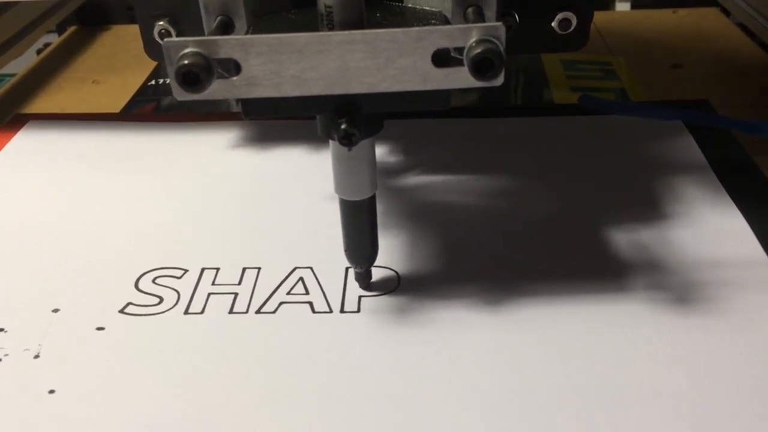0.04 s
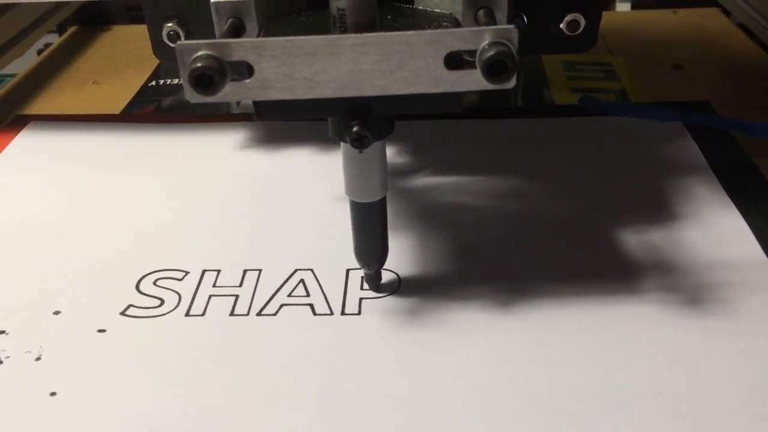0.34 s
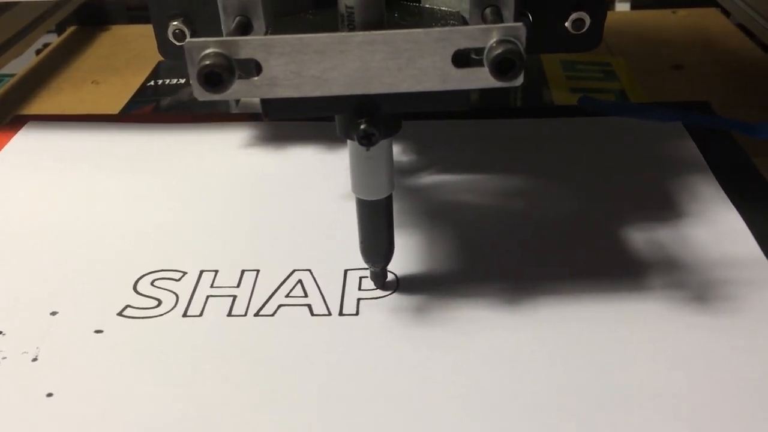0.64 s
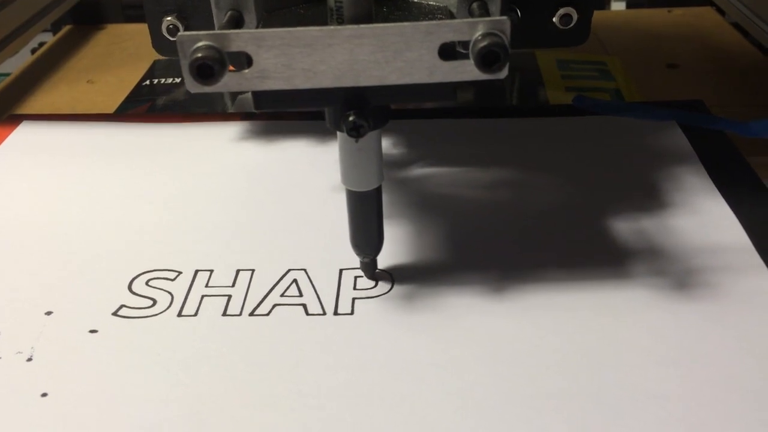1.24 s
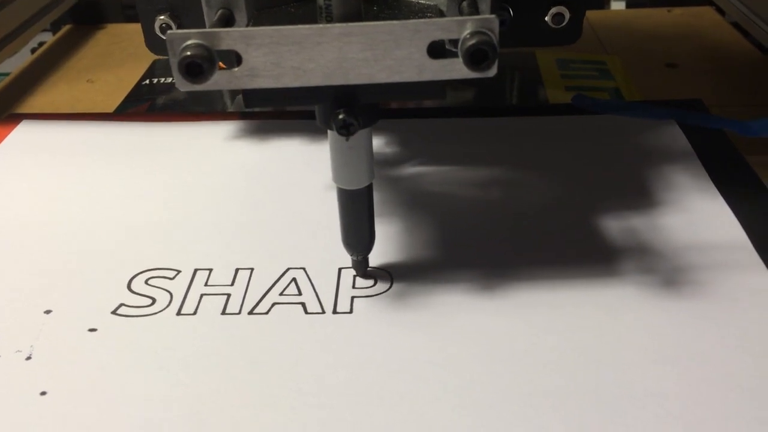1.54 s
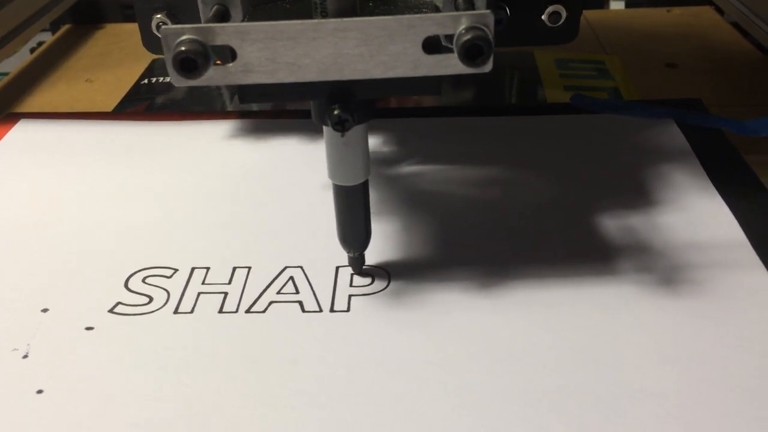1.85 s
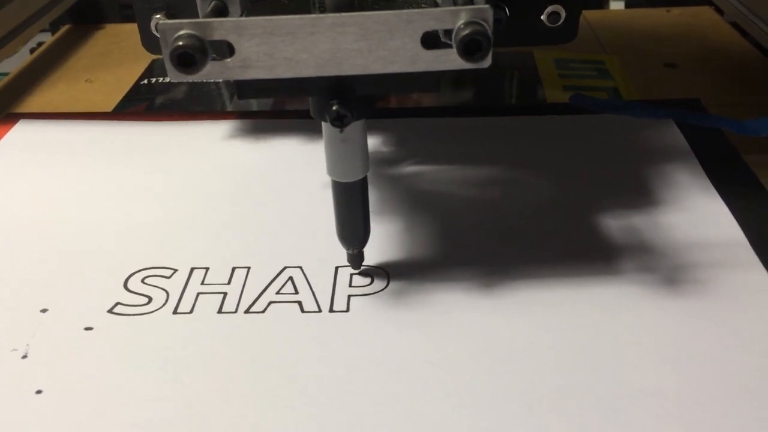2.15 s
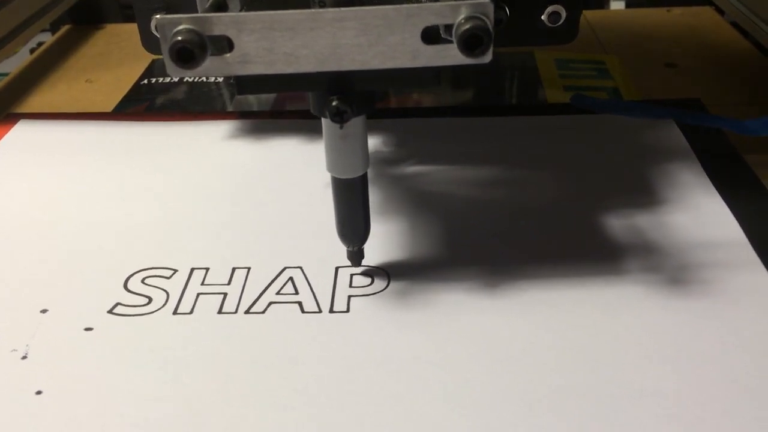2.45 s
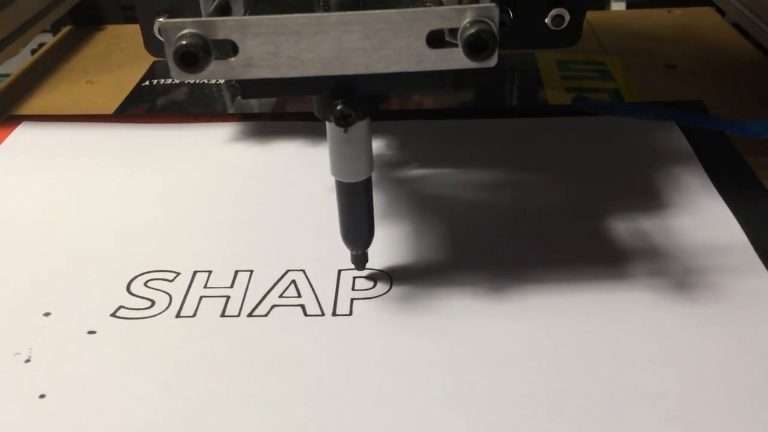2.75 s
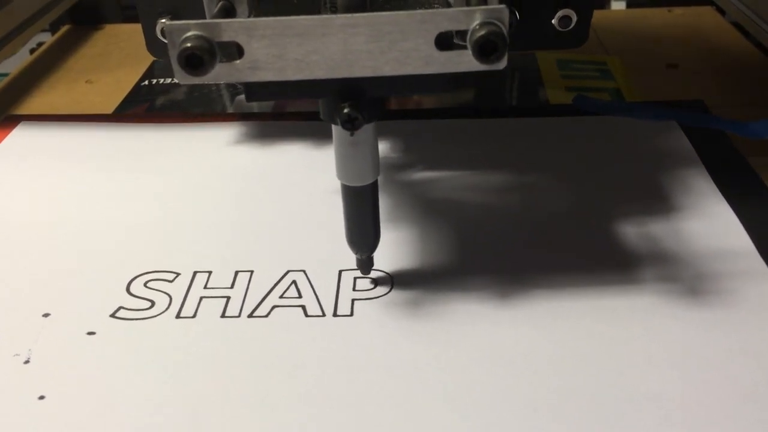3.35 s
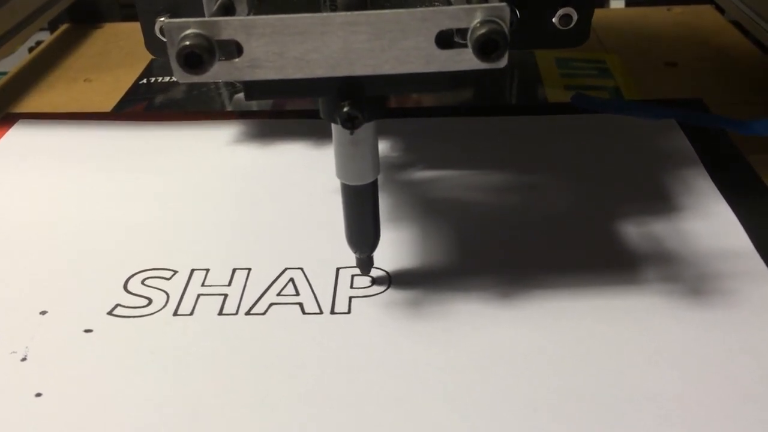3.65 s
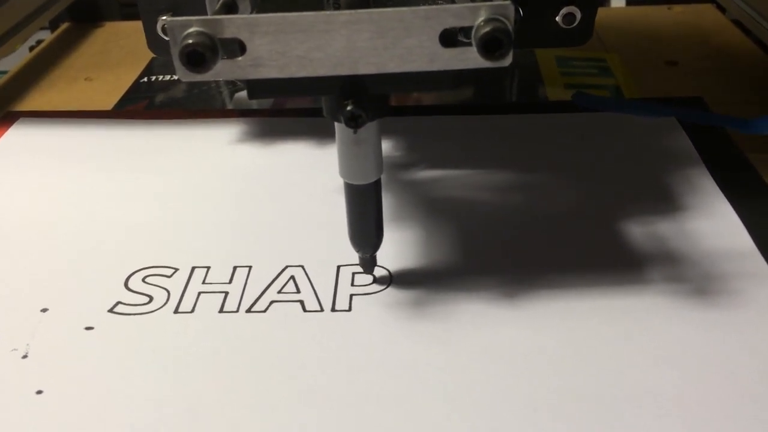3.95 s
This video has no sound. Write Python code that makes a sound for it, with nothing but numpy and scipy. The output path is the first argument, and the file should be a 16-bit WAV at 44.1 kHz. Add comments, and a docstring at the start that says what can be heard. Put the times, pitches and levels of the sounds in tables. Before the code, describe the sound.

A pen plotter's motors rise and fall in pitch, shuddering while the felt tip faintly scratches paper. The pen lifts with a squeak and a high buzz, then the carriage hums along steadily. Cooling fans drone underneath.

```python
"""Stepper motors sing up and down as a small pen plotter rounds a curved letter on a workshop bench.
The gantry shudders and knocks with the drive, and the felt tip scratches the paper. A lift screw then
raises the pen with a high buzzing whir, its steps ringing the frame, and stops with a clunk. The carriage
travels on at one speed with a throbbing hum. Two cooling fans beat underneath throughout."""
import sys
import numpy as np
from scipy import signal
from scipy.fft import rfft, irfft
from scipy.io import wavfile
from scipy.ndimage import uniform_filter1d

SR = 44100
rng = np.random.default_rng(int(sys.argv[2]) if len(sys.argv) > 2 else 0)


def inscribe(sig):
    """Save sig as 16-bit PCM at rate SR to the path in sys.argv[1].

    A 1-D sig is mono; a 2-D sig holds one channel per row.
    Samples are clipped to [-1, 1] before scaling.
    """
    pcm = np.round(np.clip(np.atleast_2d(sig).T, -1, 1) * 32767)
    wavfile.write(sys.argv[1], SR, pcm.astype(np.int16))


N = 176400  # 4 s


def undb(db):
    """Decibels to gain."""
    return 10 ** (np.asarray(db) / 20)


def unit(x):
    """Scale to rms 1."""
    return x / np.sqrt(np.mean(x ** 2))


def curve(x, table, column=1):
    """One column of a table, joined by straight lines along the first."""
    rows = np.array(table, float)
    return np.interp(x, rows[:, 0], rows[:, column])


def gate(t, start, end, fade=.016):
    """On between two times, with short fades."""
    return np.clip((t - start) / fade + .5, 0, 1) * np.clip((end - t) / fade + .5, 0, 1)


def swell(t, at, half_width, power=2):
    """A bell of level around one moment; a higher power gives a flat top and crisp edges."""
    return np.exp(-.5 * abs((t - at) / half_width) ** power)


def colour(x, eq):
    """Shape by (freq_hz, gain_db) points, falling 12 dB an octave beyond the ends; rms 1."""
    points_hz, points_db = np.array(eq, float).T
    hz = np.maximum(np.arange(N // 2 + 1) * SR / N, 1)
    octaves_outside = np.maximum(np.log2(points_hz[0] / hz), 0) + np.maximum(np.log2(hz / points_hz[-1]), 0)
    db = np.interp(np.log(hz), np.log(points_hz), points_db) - 12 * octaves_outside
    return unit(irfft(rfft(x) * undb(db), N))


def noise():
    """White noise."""
    return rng.standard_normal(N)


def drift(rate_hz):
    """Smooth random wander with rms 1."""
    width = max(int(SR / rate_hz), 2)
    return unit(uniform_filter1d(uniform_filter1d(noise(), width), width))


def phase_of(hz):
    """Phase in radians of a changing pitch."""
    return 2 * np.pi * np.cumsum(hz) / SR


def tones(phase, partials, flicker_db, rate_hz):
    """Multiples of a phase, each with a slightly unsteady level."""
    return sum(np.sqrt(2) * undb(db + flicker_db * drift(rate_hz))
               * np.sin(multiple * phase + rng.uniform(0, 2 * np.pi)) for multiple, db in partials)


def ticks(phase):
    """One click per cycle, shared between neighbouring samples."""
    cycles = phase / (2 * np.pi)
    at = np.interp(np.arange(1, int(cycles[-1])), cycles, np.arange(N))
    taps = at.astype(int)[:, None] + np.arange(-3, 5)
    clicks = np.zeros(N + 16)
    np.add.at(clicks, taps, np.sinc(taps - at[:, None]))
    return clicks[:N]


# Low rush of fan air: freq_hz, gain_db
AIR_EQ = [(25, -19), (55, 4), (130, 4), (230, -8.5), (350, -13.5), (520, -13), (900, -18.5), (1300, -10.5),
          (1800, -19), (2300, -24.5), (6000, -34), (9000, -40.5), (15500, -40.5)]

def cooling_fans(t):
    """Two rotors at slightly different speeds beat against each other over a bed of air."""
    pitch_hz, beat_hz, dip_s = 118.3, 3.39, 2.18
    first = phase_of(pitch_hz * (1 + .0016 * drift(4.3)))
    second = first - 2 * np.pi * beat_hz * (t - dip_s)
    hum = np.sqrt(2) * (undb(-40) * np.sin(first) - undb(-45) * np.sin(second))
    return hum + undb(-46 + 1.2 * drift(11)) * colour(noise(), AIR_EQ)


# Steady tones of the motor drivers: pitch_hz, level_db
WHINE_TONES = [(1916, -67), (2930, -73), (5728, -73), (6395, -77)]

def driver_whine(t):
    """The motor drivers give off a thin, flickering whine."""
    return tones(2 * np.pi * t, WHINE_TONES, flicker_db=1.2, rate_hz=24)


# Bright scratch of felt on paper: freq_hz, gain_db
PAPER_EQ = [(2500, -5.5), (2980, 1), (3500, -13.5), (4250, 3.5), (5200, -11), (5800, 6), (6600, -4),
            (10200, -13), (10750, -1), (11200, -15.5), (15500, -11)]
# Catches of the tip: centre_s, level_db, half_width_s
TIP_CATCHES = [(0.142, -60.5, 0.015), (0.654, -48.5, 0.01), (0.782, -58, 0.01), (1.25, -59, 0.023),
               (1.547, -58, 0.0087)]

def felt_tip(t):
    """Grainy rubbing on the paper, louder where the tip catches."""
    stroke = undb(-64) * gate(t, -1, 1.58, fade=.089)
    catches = sum(undb(db) * swell(t, at, half) for at, db, half in TIP_CATCHES)
    return (stroke + catches) * colour(noise() * undb(2.2 * drift(250)), PAPER_EQ)


# Soft knocks of the drive: start_s, level_db
DRIVE_KNOCKS = [(.283, -39.5), (.41, -35), (1.262, -35.5), (1.695, -40)]
# Gantry modes under each knock: pitch_hz, gain_db, t60_s
GANTRY_MODES = [(203, -1, .06), (283, 0.5, 0.27)]

def gantry_knocks(t):
    """Slack in the drive takes up with a soft knock, and the gantry rings on."""
    knocks = np.zeros(N)
    for start, level_db in DRIVE_KNOCKS:
        age = np.maximum(t - start, 0)
        for hz, gain_db, t60 in GANTRY_MODES:
            knocks += undb(level_db + gain_db - 60 * age / t60) * np.sin(2 * np.pi * hz * age)
    return knocks


def rough_tone(hz, jitter):
    """A sine roughened by fast pitch jitter, given as a fraction of its pitch."""
    return np.sqrt(2) * np.sin(phase_of(hz * (1 + jitter * drift(277))))


# Partials of the lift motor's starting squeak, mostly harmonics of its step tone: pitch_hz, gain_db, t60_s
SQUEAK_PARTIALS = [(547, 1.5, 0.077), (715, -6.5, 0.32), (1422, -4, 0.088), (2173, -11.5, 0.17),
                   (3590, -10.5, .04), (4312, 0, 0.052)]

def lift_squeak(t):
    """The lift motor starts with a raspy squeak."""
    start_s, attack_s, hold_s = 1.765, .013, .0061
    attack = np.clip((t - start_s) / attack_s, 0, 1)
    tail_s = np.maximum(t - start_s - attack_s - hold_s, 0)
    envelope = lambda t60: attack * undb(-60 * tail_s / t60)
    squeak = sum(undb(-36.5 + db) * envelope(t60) * rough_tone(hz, jitter=.0075)
                 for hz, db, t60 in SQUEAK_PARTIALS)
    rasp = colour(noise(), [(400, 5), (800, 9), (1500, -2), (4800, -5), (6300, -1), (15000, -16)])
    return squeak + undb(-40) * envelope(t60=.09) * rasp


# Brief blips of resonance: centre_s, pitch_hz, level_db, half_width_s
RESONANCE_BLIPS = [(1.561, 1170, -46, 0.0087), (1.802, 880, -46, .011), (1.803, 2156, -47, 0.0061),
                   (1.833, 538, -40, 0.008), (1.845, 2970, -43, 0.009), (2.586, 553, -43.5, 0.014),
                   (2.598, 2990, -48.5, 0.012), (2.619, 851, -42, 0.008), (2.625, 2430, -47, 0.012),
                   (2.646, 540, -35, 0.0048), (2.66, 289.3, -32, 0.009), (2.698, 189.4, -32.5, 0.0062)]

def passing_resonances(t):
    """Single resonances sing briefly as a motor's changing speed passes them."""
    return sum(undb(db) * swell(t, at, half) * rough_tone(hz, jitter=25 / hz)
               for at, hz, db, half in RESONANCE_BLIPS)


def lift_clunk(t):
    """The lift stops with a short, dull clunk."""
    body = colour(noise(), [(170, -2), (330, -2), (480, 2), (900, -11)])
    return undb(-38.5) * swell(t, at=2.66, half_width=.024) * body


# Hum of straight travel, six low partials and then the upper ones: step_multiple, level_db
TRAVEL_PARTIALS = [(.25, -56), (.5, -43), (.75, -54), (1, -34.5), (1.25, -65), (1.5, -57.5), (2, -60.5),
                   (2.5, -62.5), (4, -60.5), (5, -54.5), (5.125, -63)]
# Rattle of the carriage bearings: freq_hz, gain_db
BEARING_EQ = [(300, 9), (520, -2), (700, -28), (950, -36), (1130, -11.5), (1330, 8), (1600, -12.5),
              (1820, -1.5), (2100, -21.5), (3000, -13), (3600, -23), (6000, -16), (15500, -40.5)]

def carriage_travel(t):
    """Steady stepping over rattling bearings; the pattern repeats every sixteen steps, so it throbs."""
    start_s, step_hz, dip_s = 2.68, 266.6, 3.051
    phase = phase_of(step_hz * (1 + .00081 * drift(27.5)))
    beat = 2 * np.pi * step_hz / 16 * (t - dip_s)
    deep_throb = 1 - .29 * np.cos(beat) - .21 * np.cos(2 * beat)
    light_throb = 1 - .15 * np.cos(beat)
    hum = tones(phase + .03 * np.sin(beat), TRAVEL_PARTIALS[:6], flicker_db=1.17, rate_hz=4.1)
    overtones = tones(phase, TRAVEL_PARTIALS[6:], flicker_db=2, rate_hz=20)
    shake = light_throb * (1 + .5 * np.sin(phase / 2) + .34 * np.sin(phase))
    rattle = undb(-53) * colour(noise() * shake, BEARING_EQ)
    return (deep_throb * hum + light_throb * overtones + rattle) * gate(t, start_s, 10)


def frame_ring(x, t60_s=.22):
    """The dense, short ring of the metal frame; rms 1."""
    age = np.arange(SR // 4) / SR
    ring = rng.standard_normal(len(age)) * undb(-60 * age / t60_s)
    return unit(signal.fftconvolve(x, ring)[:N])


# The screw's run from spin-up to braking: time_s, step_hz, buzz_and_rub_gain_db
LIFT_MOVE = [(1.757, 350, -2), (1.772, 716, -4), (1.792, 726.6, -2), (1.803, 885, -3), (1.85, 1333, -2.5),
             (1.89, 1333, -2), (2.1, 1332, -3.5), (2.555, 1340, -2.5), (2.612, 852, 0.5), (2.643, 551, 0.5),
             (2.658, 285, -4)]
# Chirps of the step tone, short and long in turn: centre_s, level_db, half_width_s
LIFT_CHIRPS = [(1.945, -40, .031), (2.092, -38.5, 0.057), (2.243, -41, 0.035), (2.392, -39, 0.06),
               (2.535, -40, 0.022)]
# Whine at full speed: step_multiple, level_db, swing_db, crest_turns
LIFT_OVERTONES = [(2, -59, 4, .08), (3, -68, 6, .37), (4, -68.5, 5, .42), (5, -64, 1.5, .2),
                  (7.125, -69.5, 3, -.15), (7.25, -68, 2, -.1), (9, -73.5, 1, 0), (11.25, -71.5, 1, 0)]
# Body of the lift carriage: freq_hz, gain_db
LIFT_BODY_EQ = [(250, -10), (520, 21), (950, 8), (1400, 14), (1800, 1), (2200, 7.5), (2450, 0), (2680, 10),
                (2850, -10), (3000, 3.5), (3250, -12), (3900, -12.5), (4400, -1.5), (5300, -11),
                (6200, -12.5), (8900, -13.5), (9500, -5.5), (10000, -13.5), (15000, -10)]
# Bright, thin ticks: freq_hz, gain_db
TICK_EQ = [(1200, -16), (2300, -2), (5000, -2), (9000, 0)]
# Duller rub of the screw: freq_hz, gain_db
RUB_EQ = [(3000, 1.5), (6000, -3.5), (10000, -7.5)]

def lift_screw(t):
    """The screw chirps twice a turn, its whine and rattle swell once a turn, every eighth step ticks."""
    full_speed_hz, turn_s, crest_s = 1333.3, .3, 2.395
    full_from_s, full_until_s = LIFT_MOVE[4][0], LIFT_MOVE[7][0]
    step_hz = np.where((t > full_from_s) & (t < full_until_s), full_speed_hz, curve(t, LIFT_MOVE))
    phase = phase_of(step_hz)
    angle = 2 * np.pi * (t - crest_s) / turn_s
    chirp_level = sum(undb(db) * swell(t, at, half, power=3.1) for at, db, half in LIFT_CHIRPS)
    chirps = np.sqrt(2) * chirp_level * np.sin(phase)

    wobble = phase + .008 * drift(90)
    whine = np.zeros(N)
    for multiple, db, swing_db, crest_turns in LIFT_OVERTONES:
        swing = undb(swing_db * np.cos(angle - 2 * np.pi * crest_turns))
        whine += swing * tones(wobble, [(multiple, db)], flicker_db=2.2, rate_hz=30)
    whine *= (step_hz / full_speed_hz) ** 10 * gate(t, full_from_s, full_until_s, fade=.03)

    ringing_ticks = frame_ring(ticks(phase / 8) * undb(3.4 * drift(190)))
    buzz = undb(-52) * colour(colour(ringing_ticks, TICK_EQ), LIFT_BODY_EQ)
    grains = noise() * (1 + .5 * np.sin(phase / 8)) * undb(3 * drift(210))
    rub = undb(-48.5 + 2.3 * drift(60)) * colour(colour(grains, RUB_EQ), LIFT_BODY_EQ)
    load_db = 1.4 * np.cos(angle + 1.1) + .8 * np.cos(2 * angle)
    rattle = (buzz + rub) * undb(load_db + curve(t, LIFT_MOVE, column=2))
    return (chirps + whine + rattle) * gate(t, LIFT_MOVE[0][0], LIFT_MOVE[-1][0], fade=.011)


# Pitch arches of the letter: crest_s, crest_hz, rise_s, fall_s, rise_flatness, fall_flatness
LETTER_STROKES = [(.235, 377, .155, .48, 1.7, 2.6), (.94, 385, .205, .24, 2.4, 2.4),
                  (1.41, 383, .224, .185, 2.4, 1.7)]

def leading_step_rate(t):
    """The leading axis runs at full feed mid-stroke and at 1 / sqrt(2) of it on the diagonals."""
    step_hz = np.full(N, 125.)
    for crest_s, crest_hz, rise_s, fall_s, rise_flatness, fall_flatness in LETTER_STROKES:
        away_s = abs(t - crest_s)
        sag = np.where(t < crest_s, (away_s / rise_s) ** rise_flatness, (away_s / fall_s) ** fall_flatness)
        step_hz = np.maximum(step_hz, crest_hz * (1 - (1 - np.sqrt(.5)) * sag))
    return step_hz


# Weight of the step tone across its range: step_hz, gain_db
STEP_TONE_EQ = [(200, 0.5), (240, -8), (280, 3.5), (335, -6.5), (382, 1)]
# Overtones that flare in the frame's resonances: step_multiple, peak_db, resonance_hz, half_width_hz
FRAME_FLARES = [(2, -60, 760, 35), (3, -53, 1105, 32), (4, -54, 1330, 60), (4, -56.5, 1495, 40)]
# How hard the gantry shakes along the letter: time_s, level_db
SHAKE_ENVELOPE = [(0, -58), (.22, -62), (.36, -56), (.44, -41.5), (.58, -46), (.73, -34.5), (.8, -42.5),
                  (.98, -52), (1.1, -43.5), (1.2, -34.5), (1.32, -43.5), (1.44, -40.5), (1.58, -52),
                  (1.75, -45.5)]
# Low body of the gantry: freq_hz, gain_db
GANTRY_EQ = [(40, -17), (80, 1.5), (180, -2), (235, -6), (285, 6.5), (325, -16), (400, -16.5), (650, -28.5)]

def drawing_motors(t):
    """The leading axis sings and rings the gantry's resonance; the other steps unevenly and shakes it."""
    feed_hz, gantry_hz, gantry_half_width_hz = 384, 278, 20.5
    step_hz = leading_step_rate(t)
    phase = phase_of(step_hz * (1 + .004 * drift(72)))
    shake = undb(curve(t, SHAKE_ENVELOPE))
    gantry_ring = undb(3.5) * shake / (1 + ((step_hz - gantry_hz) / gantry_half_width_hz) ** 2)
    song = np.sqrt(2) * (undb(-45.5 + curve(step_hz, STEP_TONE_EQ)) + gantry_ring) * np.sin(phase)

    judder = phase + .06 * drift(120)
    for multiple, db, resonance_hz, half_width_hz in FRAME_FLARES:
        overtone = tones(judder, [(multiple, db)], flicker_db=2.5, rate_hz=24)
        song += overtone / (1 + ((multiple * step_hz - resonance_hz) / half_width_hz) ** 2)

    other_hz = np.sqrt(np.maximum(feed_hz ** 2 - step_hz ** 2, 100 ** 2))
    uneven_steps = ticks(phase_of(other_hz * np.exp(.45 * drift(200)))) / np.sqrt(other_hz)
    shudder = undb(-.5) * shake * colour(uneven_steps - uneven_steps.mean(), GANTRY_EQ)
    rattle = undb(-50.5 + 2.8 * drift(17)) * colour(noise() * (1 + .5 * np.sin(phase)), BEARING_EQ)
    return (song + shudder + rattle) * gate(t, -1, LIFT_MOVE[0][0])  # ends as the lift starts


def scene():
    """Draw, lift and travel over the fans and drivers, in mono."""
    t = np.arange(N) / SR
    drawing = drawing_motors(t) + gantry_knocks(t) + felt_tip(t)
    lifting = lift_screw(t) + lift_squeak(t) + passing_resonances(t) + lift_clunk(t)
    return (drawing + lifting + carriage_travel(t) + cooling_fans(t) + driver_whine(t))[None]


def record(dry):
    """A steep low-pass trims the very top."""
    cutoff_hz = 15400
    return signal.sosfilt(signal.ellip(10, .2, 80, cutoff_hz, fs=SR, output="sos"), dry)


dry = scene()
out = record(dry)
inscribe(out)
```